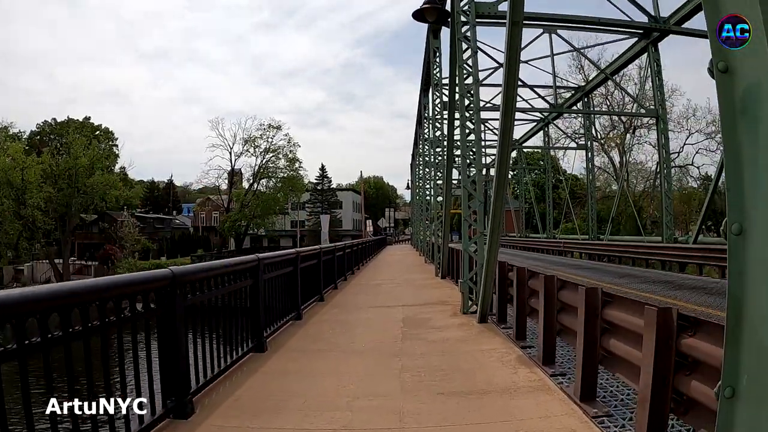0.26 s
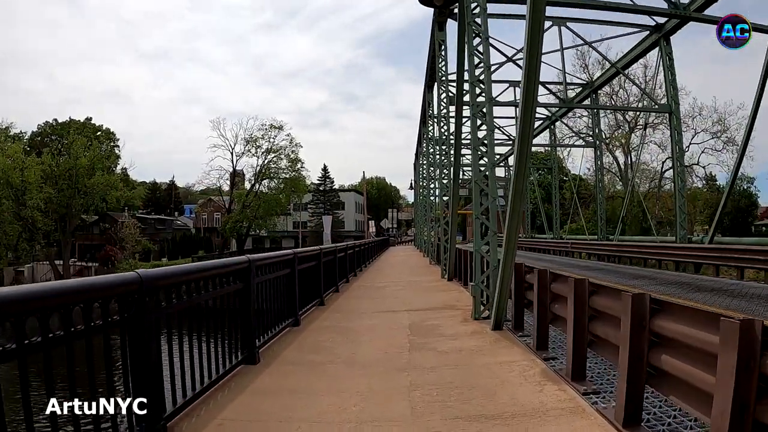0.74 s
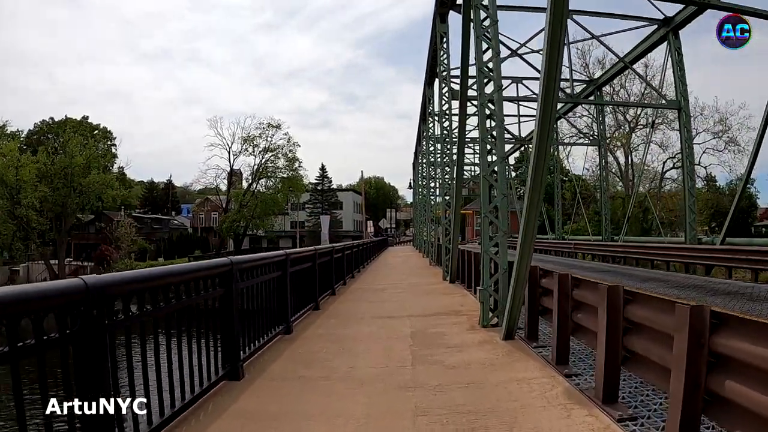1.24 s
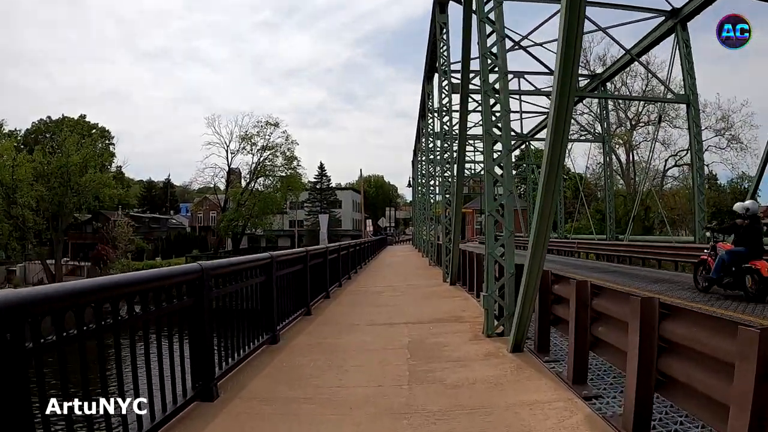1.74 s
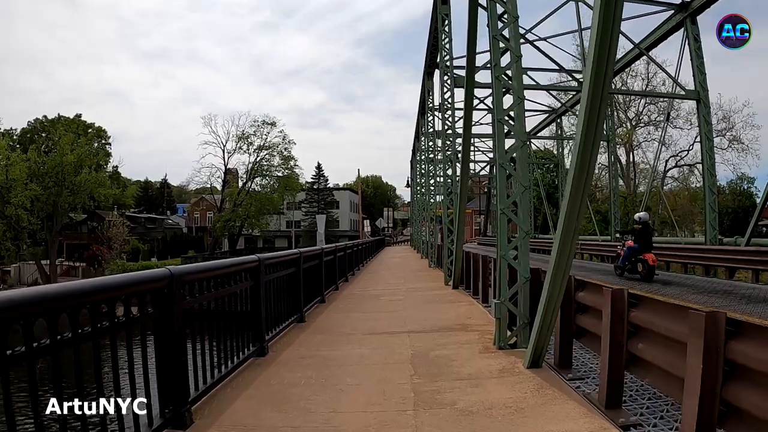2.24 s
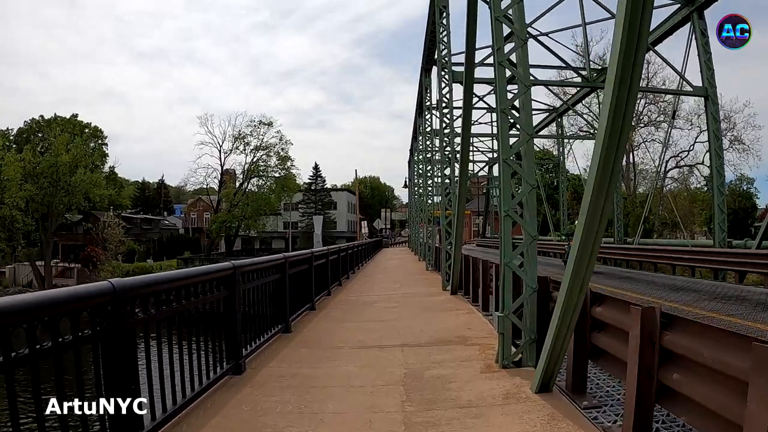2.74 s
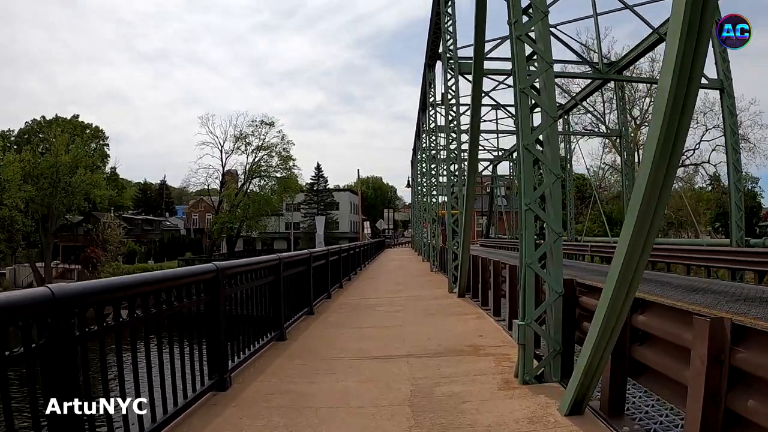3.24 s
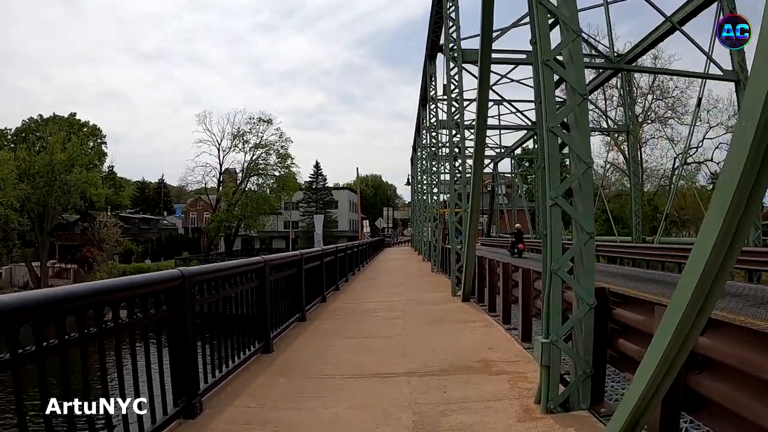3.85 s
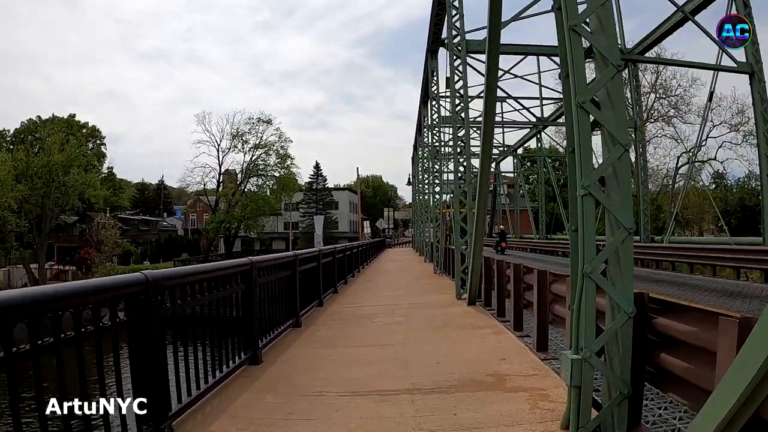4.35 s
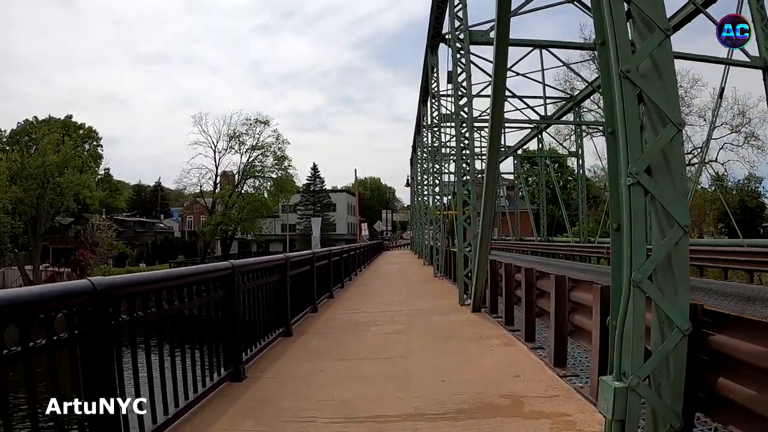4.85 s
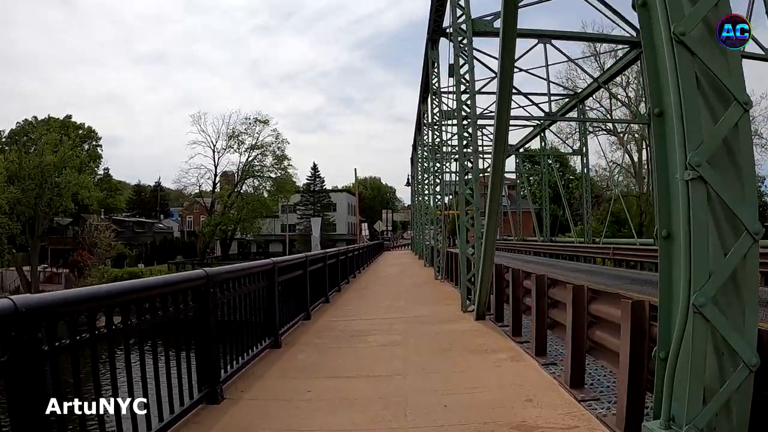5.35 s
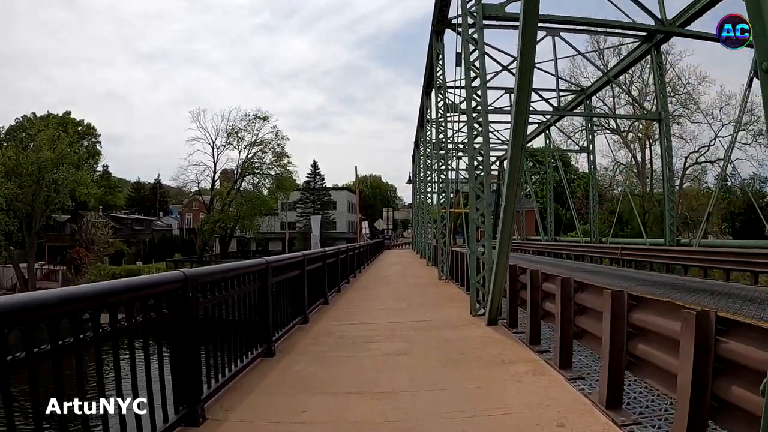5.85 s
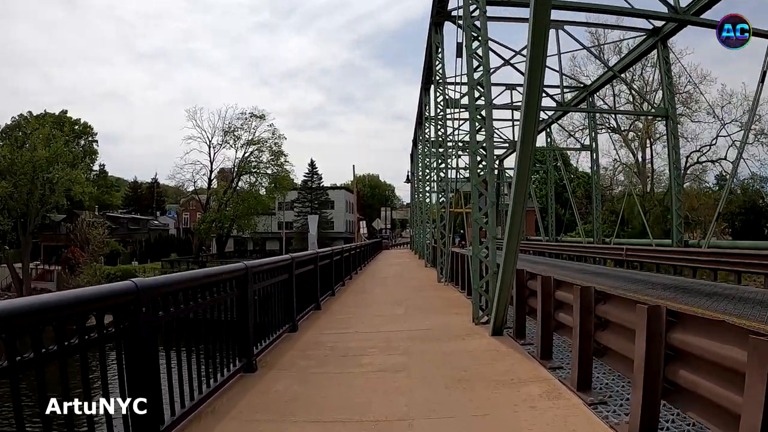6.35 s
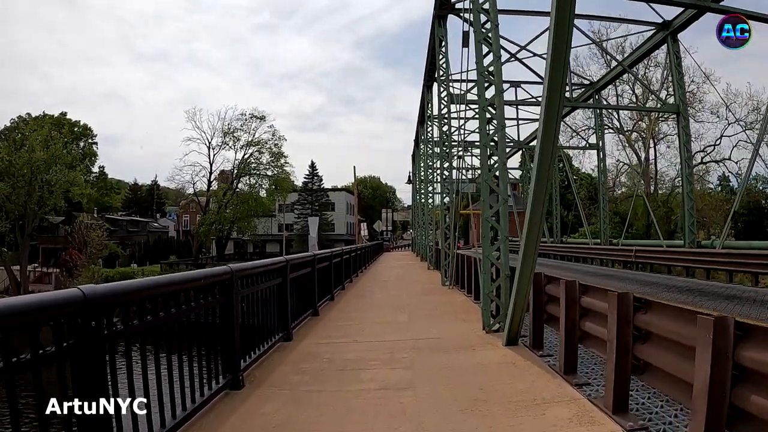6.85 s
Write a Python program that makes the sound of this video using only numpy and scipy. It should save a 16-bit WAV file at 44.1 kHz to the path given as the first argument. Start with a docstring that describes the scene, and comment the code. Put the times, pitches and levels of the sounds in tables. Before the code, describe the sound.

On the footway of an open-deck steel bridge, a stereo microphone hears tyres droning low and roaring softly on the grid to the right. A chuffing twin-cylinder motorcycle approaches with small metallic chinks, passes near two seconds with crackling exhaust, then recedes behind girders. Loose panels clank in scattered clusters. Finally the throttle closes to soft puffs while a distant bird chips.

```python
"""Footway of a steel truss bridge with an open grid deck, roadway to the right, a two-port microphone.
From the start tyres drone and roar on the grid and a twin-cylinder motorcycle chuffs: engine orders under
bursts of hiss. Loose panels clank as struck modes with noise; the grid rattles in clumps of clicks.
The motorcycle passes 3.7 m off at 1.8 s with chinks and hard cracks, then rides away behind girders.
After 5.3 s a distant bird chips in falling whistles, the throttle shuts to soft puffs, and a wash swells."""
import sys
import numpy as np
from scipy import signal
from scipy.fft import rfft, irfft
from scipy.io import wavfile
from scipy.ndimage import uniform_filter1d, map_coordinates

SR = 44100
rng = np.random.default_rng(int(sys.argv[2]) if len(sys.argv) > 2 else 0)


def to_wav(s):
    """Save 16-bit WAV."""
    ch = np.atleast_2d(s).T  # columns
    pcm = np.round(np.clip(ch, -1, 1) * 32767)  # PCM
    wavfile.write(sys.argv[1], SR, pcm.astype(np.int16))


N = 313110
TIME, HZ = np.arange(N) / SR, np.fft.rfftfreq(N, 1 / SR)

# Levels are relative: each function adds its own trim. Spectra give only the shape of a colour.

# Microphone ports. Likeness of the two: pitch_hz, likeness (0-1)
PORT_LIKENESS = [(30, .75), (70, .985), (300, .99), (700, .94), (2000, .9), (3500, .82), (6000, .72),
                 (8000, .45), (11000, .45), (15000, .2)]
# lead of the right port for sound from the roadway: pitch_hz, lead_rad
PORT_LEAD = [(0, 0), (250, .1), (600, .34), (1200, .7), (2400, 1.45), (3200, 1.15), (4000, 1.75), (5000, 2),
             (6500, 2.6), (8000, 3), (9000, 2.5), (11000, 3.1)]
# left minus right: pitch_hz, level_db
PORT_LEAN = [(60, 5), (300, 2), (1000, 1), (1700, 2), (2800, 0.5), (4000, 0), (5200, -2.5), (7200, 1),
             (8400, -2), (10000, -3), (13000, -2.5)]
EDGE_HZ = 15100  # highest pitch kept

# Motorcycle engine speed: time_s, four_stroke_cycles_per_s
ENGINE_SPEED = [(0, 15.05), (.5, 14.95), (1, 14.7), (1.5, 14.55), (1.8, 14.37), (2.5, 14.39), (3.5, 14.43),
                (4.5, 14.39), (5.2, 14.36), (5.6, 14.0)]
# a moment the first cylinder fires (s), and the second cylinder's lag (cycles)
FIRING_S, SECOND_CYLINDER = 2.286, .585
# the ride: moment it is nearest (s), speed (m/s), distance of its lane (m)
PASS_S, RIDE_M_PER_S, LANE_M = 1.82, 6.56, 3.68
# exhaust orders: multiple of the cycle rate, level_db
EXHAUST_ORDERS = [(4, -33.5), (5, -28.5), (6, -32), (7, -24.5), (8, -31), (9, -36), (10, -39), (11, -36),
                  (12, -35), (14, -41.5), (15, -36), (17, -41.5), (19, -34.5), (20, -42.5), (21, -29.5),
                  (22, -38.5), (24, -51.5)]
# orders that swell and fade as the ride shifts their echoes: multiple, crest_s, period_s, depth_db
BOOMING_ORDERS = [(5, 4.19, 2.5, 6), (6, 0.66, 2.1, 6), (7, 2.74, 1.675, 1), (12, 2.27, 2.7, 5),
                  (19, 2.37, 1.7, 4.5), (21, 3.2, 2.4, 0.5)]
# hiss of the tailpipes with their narrow resonances: pitch_hz, density_db_per_hz
CHUFF_COLOUR = [(500, -7), (1500, -2.5), (2300, -8.5), (2470, -0.5), (2900, -6.5), (3520, 0.5), (3650, -7),
                (3780, 0), (4000, -4), (4300, -1), (4540, -3), (4750, -2.5), (5300, -3.5), (5650, -5.5),
                (6200, -8), (7200, -10), (8000, -18.5), (8550, -12), (9200, -17), (10000, -27.5),
                (11200, -25.5), (12500, -28), (15000, -41.5)]
# second cylinder's pipe against the first, as the angle to the tailpipes changes: time_s, level_db
SECOND_PIPE = [(1.6, 2.5), (2.0, -3.5), (2.15, -5), (2.4, -2.5), (2.6, -3.5), (3.5, -2.5), (4.3, -2),
               (5.2, -0.5)]
# hiss beams backwards: level at the lane's distance, gain ahead of the pipe (dB)
CHUFF_DB, AHEAD_DB = -35.5, -26
# the beam's edge: place along the road and width (m)
BEAM_AT_M, BEAM_EDGE_M = -.7, 1.6
# the rider opens up a little before shutting the throttle: from (s), extra hiss (dB)
PUSH_S, PUSH_DB = 4.89, 2
# girders pass between tailpipes and footway: time_s, loss_db
GIRDER_SHADOWS = [(2.48, 1), (2.78, 4.5), (3.28, 7), (3.75, 1.5), (4.038, 10), (4.65, 11.5), (4.86, 9)]
SHADOW_S = .029  # half the length of each shadow
# far guard rail's echo of the exhaust as the angle changes: time_s, delay_s, strength
RAIL_ECHO = [(1.0, .0053, .5), (1.9, .0077, .35), (2.1, .0075, .35), (2.6, .006, .55), (3.1, .0047, .85),
             (3.6, .004, .7), (5.5, .0027, .45)]
CREST_S = .0025  # from the valve opening to the crest of its burst
# the truss scatters each burst: strength, decay (s)
SCATTER, SCATTER_S = .37, .03
# grain of the bursts: depth (dB), rate (Hz); furthest a firing strays (s)
CRACKLE_DB, CRACKLE_HZ, STRAY_S = 2.8, 220, .001
# sharpest exhaust cracks: start_s, snap_db, bark_db, fizz_db
CRACKS = [(1.016, -54, -32, -65), (1.22, -46, -37, -59), (1.29, -48, -32.5, -60), (1.356, -48.5, -33, -57),
          (1.426, -49, -39, -58), (1.495, -56, -35, -72), (1.564, -43.5, -38, -54),
          (1.5917, -44, -29.5, -70), (1.633, -46, -29.5, -60), (1.704, -46, -38.5, -65),
          (1.728, -36, -32.5, -52), (1.798, -33.5, -29.5, -55), (1.871, -31.5, -38.5, -57),
          (1.94, -38, -36.5, -70), (1.987, -35, -39, -59), (2.009, -27, -40, -55),
          (2.076, -29.5, -31.5, -64), (2.147, -28.5, -26.5, -73), (2.2164, -33, -30.5, -72),
          (2.2846, -25, -30, -66), (2.355, -25, -32, -58), (2.5615, -30, -38, -63),
          (2.632, -34.5, -42, -61), (2.82, -44, -32, -68), (2.888, -33, -34, -63), (2.958, -36, -33, -64),
          (3.027, -35.5, -34.5, -68), (3.123, -33, -45, -68), (3.4, -40.5, -52, -71),
          (3.4632, -37.5, -47, -69), (3.601, -34.5, -47, -73), (5.342, -40.5, -47.5, -77)]
# colour of the snap in the pipe's upper resonances: pitch_hz, density_db_per_hz
SNAP_COLOUR = [(500, -11.5), (1500, -2), (2900, -11.5), (3550, 3.5), (3650, -1.5), (3770, 9), (4000, 4.5),
               (4300, 7), (4540, 9), (4750, 7), (5300, 7), (5700, -1), (6300, -14.5), (8000, -17.5),
               (8600, -12), (10000, -28.5), (15000, -39.5)]
# colour of the hollow bark: pitch_hz, density_db_per_hz
BARK_COLOUR = [(500, -15), (1200, -5), (1720, 2.5), (2250, 1), (2460, 3), (2800, -2.5), (3400, -2),
               (3900, -9.5), (5000, -31), (9000, -50), (15000, -73)]
# colour of the thin fizz: pitch_hz, density_db_per_hz
FIZZ_COLOUR = [(3000, -16), (6000, -6), (8500, 2), (10000, 4), (11500, 1), (13000, -1), (14300, -8.5),
               (15000, -18)]
# slow puffs, mostly in pairs, once the throttle is shut: start_s, level_db
PUFFS = [(5.5606, -42), (5.7162, -56), (5.7636, -45.5), (5.8794, -48), (5.9322, -48), (6.1453, -41.5),
         (6.2, -55.5), (6.2745, -58), (6.3298, -53), (6.3852, -53), (6.5214, -42.5), (6.5763, -45),
         (6.716, -43), (6.7738, -47.5), (6.911, -44), (6.9719, -48.5)]
# small metallic chinks as the motorcycle rides over the grid: start_s, pitch_hz, peak_db
CHINKS = [(.617, 2620, -32), (.825, 3400, -43), (.881, 1721, -26.5), (.916, 1870, -28), (.944, 1990, -23),
          (1.015, 3450, -29), (1.045, 3600, -32), (1.149, 2650, -28), (1.219, 3310, -28),
          (1.288, 3396, -28), (1.357, 3020, -27), (1.453, 2300, -28), (1.492, 1830, -21),
          (1.568, 2240, -28), (1.702, 3500, -27), (2.05, 2250, -22), (2.675, 3300, -29), (3.65, 3450, -34),
          (5.245, 3830, -34), (5.317, 3330, -33), (5.386, 3450, -35)]

# Tyres drumming over the grid bars: time_s, pitch_hz, width_hz
DRONE_BAND = [(0, 92.12, 75.37), (2.5, 91.9, 60.51), (5, 102.1, 70.11), (5.95, 100.7, 50.48),
              (6.4, 92.7, 40.57), (6.9, 84.97, 21.93), (7.1, 82.5, 21.85)]
# level of that drone: time_s, level_db
DRONE_LEVEL = [(0, -18.5), (.4, -20), (1.5, -23), (2.0, -34), (2.45, -32), (2.75, -20), (3.3, -26.5),
               (3.8, -23.5), (4.3, -33), (5.2, -25), (5.45, -24), (5.95, -21.5), (6.4, -25), (6.85, -20.5),
               (7.1, -24)]
# tyre roar as cars draw near and recede: time_s, level_db
ROAR_LEVEL = [(0.0, -38), (0.47, -39.5), (0.6, -37), (0.87, -36.5), (1.32, -36), (1.54, -35), (2.69, -38),
              (3.1, -39), (3.44, -41), (6.43, -44.5), (7.1, -44)]
# colour of the roar: pitch_hz, density_db_per_hz
ROAR_COLOUR = [(250, -12), (450, 7.5), (600, 1.5), (820, -3), (1030, 0), (1350, -5), (1800, -8),
               (2600, -11.5), (3800, -16.5), (4800, -22.5), (7000, -28), (9400, -35), (10500, -41),
               (13000, -44), (15000, -74.5)]
# colour of the deck's ring: pitch_hz, density_db_per_hz
DECK_COLOUR = [(30, -67), (110, -22), (165, 1.5), (200, -1.5), (240, 3.5), (265, 3.5), (300, 5.5),
               (325, -1.5), (355, -5.5), (440, -14.5), (520, -22.5), (800, -60), (4000, -110)]
# deck's ring under the wheels: time_s, level_db
DECK_LEVEL = [(0, -28), (.5, -23), (.9, -25), (1.25, -22), (1.8, -25), (2.25, -26.5), (2.6, -31),
              (3.15, -24.5), (3.4, -31.5), (3.75, -26), (4.1, -31), (5.2, -31.5), (5.7, -38), (6.55, -35.5),
              (6.75, -33.5), (7.1, -40)]
# the ring sinks as the cars slow: time_s, pitch_factor
DECK_PITCH = [(0, 1.05), (1.3, 1.04), (2.2, .99), (5.3, 1), (6.1, .91), (7.1, .87)]
# grid rattle as the near wheels go by: time_s, level_db
RATTLE_LEVEL = [(0, -46.5), (.55, -50), (.95, -44), (1.1, -55), (1.4, -38), (1.7, -45.5), (2.3, -45.5),
                (2.8, -52), (3.3, -49), (4.5, -61), (5.5, -69.5)]
# colour of that rattle: pitch_hz, density_db_per_hz
RATTLE_COLOUR = [(400, -12.5), (930, 1), (1250, -7), (1750, 2.5), (2300, -5), (2460, -2.5), (2900, -9),
                 (3550, -8), (4500, -14), (7000, -27), (10000, -38), (15000, -57)]
# wheels on loose panels, and the rebounds: start_s, level_db, brightness_db_per_octave, thump_db, decay_s
CLANKS = [(0.0966, -20, -4, -28, 0.011), (0.115, -23, -12, -21, 0.029), (.131, -29, -4, -26, 0.011),
          (.148, -24, -5, -18, .022), (0.1663, -24, -2, -17, 0.02), (0.5, -30.5, 2, -51, .006),
          (.513, -26, -2, -49, 0.0075), (2.569, -29.5, -9, -27, 0.058), (3.1667, -20.5, -1, -15, 0.017),
          (3.185, -22, -4, -25, 0.018), (3.194, -24, -6, -16, 0.021), (3.217, -25, -12, -16, 0.027),
          (3.238, -38, -8, -29, .01), (3.7869, -20.5, -4, -15, 0.016), (3.797, -26.5, -2, -22, 0.015),
          (3.817, -31, -5, -28, 0.015), (3.8517, -24.5, 0.5, -25, 0.015), (3.865, -26.5, -17, -22, 0.014),
          (3.883, -32, -2, -27, 0.02), (4.424, -36, 3, -25, 0.007), (4.505, -29.5, 5, -28, 0.0045),
          (4.5071, -21, 0, -14, 0.011), (4.52, -28, 0, -24, 0.0066), (4.538, -32, -4.5, -29, 0.047)]
# colour of the blows: pitch_hz, density_db_per_hz
CLANK_COLOUR = [(120, -19), (300, -8.5), (470, -1), (700, -2.5), (1050, -2), (1190, -4.5), (1340, -2),
                (1520, -4), (2100, -5), (2320, -8), (2700, -9.5), (3200, -13.5), (3500, -12.5),
                (4000, -15.5), (4700, -20.5), (5500, -29.5), (8000, -40), (14000, -68)]
# ringing modes of a panel: pitch_hz, level_db, t60_s
PANEL_MODES = [(452, 6, .25), (517, 1, .25), (587, -3, .25), (845, 6, .15), (921, 0, .3), (1001, -3, .2),
               (1287, 1, .25), (1325, 1, .22), (1394, -1, .18), (1590, -2, .2), (1938, 0, .18),
               (2114, 0, .24), (2439, -1, .18), (2627, -3, .2), (2853, -6, .2), (2950, -5, .16),
               (3440, -8, .12)]
# delay of the slap's first echo, decay of the truss's echo and of the deck's thump (s)
SLAP_ECHO_S, TRUSS_ECHO_S, THUMP_S = .003, .05, .013
# a weak blow soon after another is a rebound and slaps softly: (after s, within s), weaker than (dB)
REBOUND_S, REBOUND_DB = (.005, .035), -23.5

# Air on the bridge: pitch_hz, density_db_per_hz
AIR_COLOUR = [(15, 13), (30, 22), (50, 19.5), (90, 36), (300, 7.5), (1000, 2.5), (2500, -16), (4000, -20.5),
              (6000, -17.5), (7400, -25), (8100, -41), (8900, -32.5), (10500, -39), (12500, -52),
              (14000, -78.5)]
# bird chips: start_s, start_hz, level_db
CHIPS = [(5.31, 5950, -59), (5.5, 5904, -62), (5.85, 6100, -67), (6.014, 6800, -61), (6.323, 5800, -55),
         (6.574, 7500, -61), (6.632, 7150, -56.5), (6.725, 6700, -58)]
# every chip falls: length (s), fall (Hz per s)
CHIP_S, CHIP_FALL_HZ_PER_S = .015, 95000


def amp(db):
    """Decibels to gain."""
    return 10 ** (np.asarray(db) / 20)


def unit(x):
    """Scales to rms 1."""
    return x / np.sqrt(np.mean(x ** 2) + 1e-20)


def curves(rows):
    """The columns of a time table, at every sample."""
    s, *columns = np.transpose(rows)
    return [np.interp(TIME, s, c) for c in columns]


def read(points, hz):
    """A table on a log-frequency axis."""
    f, value = np.transpose(points)
    return np.interp(np.log(hz + 1), np.log(f + 1), value)


def add(mix, s, sound):
    """Adds a sound to the mix at time s."""
    part = mix[..., round(s * SR):][..., :sound.shape[-1]]
    part += sound[..., :part.shape[-1]]


def wander(rate):
    """Random curve of rms 1, varying up to about the given rate (Hz)."""
    hz = np.fft.rfftfreq(N // 10, 10 / SR)
    slow = irfft(rfft(rng.standard_normal(N // 10)) / (1 + (hz / rate) ** 4))
    return np.interp(TIME, np.arange(len(slow)) * 10 / SR, unit(slow))


def ports(drive, colour, turn, lean_db=0):
    """Colours two unrelated signals into a microphone pair; turn is 1 from the roadway, 0 straight ahead."""
    size = drive.shape[1]
    hz = np.fft.rfftfreq(size, 1 / SR)
    a, b = rfft(drive)
    same = read(PORT_LIKENESS, hz)
    side = amp((read(PORT_LEAN, hz) + lean_db * hz / (hz + 900)) / 2)
    left = a * side * np.exp(-1j * turn * read(PORT_LEAD, hz))
    right = (same * a + np.sqrt(1 - same ** 2) * b) / side
    return irfft(np.array([left, right]) * unit(amp(read(colour, hz))), size)


def bass_pair(x, lean_db=0):
    """The same wave at both ports; the left is stronger by lean_db plus 1.25 dB."""
    return x * amp(np.array([[1], [-1]]) * (lean_db + 1.25) / 2)


def dapple(x, depth_db, size=512):
    """Random patches over time and pitch give the noise an uneven, grainy colour."""
    z = signal.stft(x, nperseg=size, noverlap=size * 3 // 4)[2]
    patches = rng.standard_normal(z.shape[1:])
    patches = uniform_filter1d(uniform_filter1d(patches, size=7, axis=0), size=9, axis=1)
    gain = unit(amp(depth_db * np.clip(unit(patches), -2, 2)))
    return signal.istft(z * gain, nperseg=size, noverlap=size * 3 // 4)[1][:, :N]


def clicks(size, per_s, spread_db):
    """Random clicks of either sign, their strengths spread by spread_db, rms 1."""
    chance, strength = rng.random(size), rng.standard_normal(size)
    sign = rng.choice([-1, 1], size)
    return unit((chance < per_s / SR) * sign * amp(spread_db * np.clip(strength, -2, 2)))


def engine_turns():
    """Count of engine cycles; the first cylinder fires on whole numbers."""
    turns = np.cumsum(curves(ENGINE_SPEED)[0]) / SR
    return turns - np.interp(FIRING_S, TIME, turns)


def ride():
    """Motorcycle's distance gain (dB), and how far the footway lies ahead of the tailpipes' beam (0-1)."""
    along = RIDE_M_PER_S * (TIME - PASS_S)
    ahead = 1 / (1 + np.exp((along - BEAM_AT_M) / BEAM_EDGE_M))
    return -20 * np.log10(np.hypot(along, LANE_M) / LANE_M), ahead


def firing(t, sharpness=3):
    """Envelope of one burst from a tailpipe, cresting at 1."""
    return (t / CREST_S * np.exp(1 - t / CREST_S)) ** sharpness


def rail_echo(x):
    """The same sound off the guard rail: its sliding delay sweeps a comb through the hiss."""
    delay_s, strength = curves(RAIL_ECHO)
    return strength * np.array([map_coordinates(side, [(TIME - delay_s) * SR], order=3) for side in x])


def exhaust(level_db=0.0, fade_db=4.0, fade_hz=1.06, low_spread=0.12, high_spread=0.31, high_ahead_db=-4):
    """Firings sound the pipe as a stack of orders; low ones carry farthest, all die as the throttle shuts."""
    turns, (far_db, ahead) = engine_turns(), ride()
    swells = {}
    for k, crest, period, depth in BOOMING_ORDERS:
        swells[round(k)] = depth * np.cos(2 * np.pi * (TIME - crest) / period)
    stack = np.zeros(N)
    for k, db in EXHAUST_ORDERS:
        k = round(k)
        spread = np.interp(k, [7, 12], [low_spread, high_spread])  # share of the distance loss
        beam_db = ahead * np.interp(k, [8, 19], [0, high_ahead_db])
        swell = swells.get(k, fade_db * wander(fade_hz))
        gain = amp(db + level_db + spread * far_db + beam_db + swell)
        stack += gain * np.cos(2 * np.pi * (k * turns + rng.random()))
    return bass_pair(np.sqrt(2) * stack * np.interp(TIME, [5.45, 5.75], [1, 0]))


def chuffs(spread=0.97, dull_hz=9500):
    """Each exhaust valve lets out a burst of hiss, thrown back by rail and truss, duller with distance."""
    turns, kicks = engine_turns(), np.zeros(N)
    for offset, db in ((0, np.zeros(N)), (SECOND_CYLINDER, curves(SECOND_PIPE)[0])):
        at = np.flatnonzero(np.diff(np.floor(turns - offset)))
        # each firing strays in time, and in force by up to 2.5 dB
        stray, force_db = rng.uniform(-1, 1, (len(at), 2)).T * [[STRAY_S * SR], [2.5]]
        kicks[np.clip(at + stray.astype(int), 0, N - 1)] = amp(db[at] + force_db) ** 2
    t = TIME[:SR // 8]
    scatter = SCATTER * (1 - np.exp(-t / CREST_S)) * np.exp(-t / SCATTER_S)
    power = abs(signal.oaconvolve(kicks, firing(t) ** 2 + scatter ** 2)[:N])
    envelope = unit(np.sqrt(power) * amp(CRACKLE_DB * wander(CRACKLE_HZ)))
    hiss = dapple(envelope * rng.standard_normal((2, N)), 3.5)

    far_db, ahead = ride()
    shadow_db = sum(db * np.exp(-((TIME - s) / SHADOW_S) ** 2) for s, db in GIRDER_SHADOWS)
    throttle = amp(PUSH_DB * (TIME > PUSH_S)) * np.interp(TIME, [5.39, 5.45], [1, 0])
    level = amp(CHUFF_DB + spread * far_db + AHEAD_DB * ahead - shadow_db)
    near = ports(hiss * throttle * level, CHUFF_COLOUR, turn=0.93, lean_db=-1.5)
    far = irfft(rfft(near) / (1 + (HZ / dull_hz) ** 8), N)
    direct = far + amp(far_db / 2) * (near - far)
    return direct + rail_echo(direct)


def drone(level_db=0, top_hz=128, second_db=-21, third_db=-21):
    """Tyres drum over the grid bars: a wavering low band with faint overtones that sinks as a car slows."""
    hz, width = curves(DRONE_BAND)
    clock = np.cumsum(width) / SR  # the band is wide where this clock runs fast
    steps = np.arange(np.ceil(clock[-1]) * 20) / 20
    z = [1, 1j] @ rng.standard_normal((2, len(steps)))
    r = np.exp(-np.pi / 20)
    z = np.interp(clock, steps, signal.lfilter([1], np.poly([r, r]), z))
    z /= np.maximum(uniform_filter1d(abs(z) ** 2, SR // 10), 1e-9) ** .43  # evens out the swells
    z = z * np.exp(2j * np.pi * np.cumsum(hz) / SR)
    tone = unit(irfft(rfft(z.real) / np.sqrt(1 + (HZ / top_hz) ** 16), N))
    for k, db in enumerate((second_db, third_db), 2):
        tone = tone + amp(db) * unit(abs(z) * np.cos(k * np.angle(z)))
    return bass_pair(tone * amp(curves(DRONE_LEVEL)[0] + level_db))


def tyres(deck_db=0.0, roar_db=1.94, grain_db=0.43, flutter_db=1.07, far_db=-48, near_db=-40, dull_hz=1500):
    """The deck rings and the treads roar in fine grains; far cars lose their treble."""
    roar, ring = curves(ROAR_LEVEL)[0], curves(DECK_LEVEL)[0]
    rolled = np.cumsum(curves(DECK_PITCH)[0])  # reading position, so pitch follows its speed
    deck = ports(rng.standard_normal((2, N)), DECK_COLOUR, turn=1)
    deck = np.array([map_coordinates(side, [rolled], order=3, mode="mirror") for side in deck])
    deck = deck * amp(ring + deck_db)
    grains = unit(amp(grain_db * wander(200) + flutter_db * wander(31)))
    treads = dapple(rng.standard_normal((2, N)) * grains, 1.7)
    near = ports(treads * amp(roar + roar_db), ROAR_COLOUR, turn=1, lean_db=0.5)
    far = irfft(rfft(near) / (1 + (HZ / dull_hz) ** 4) ** .5, N)
    closeness = np.clip((roar - far_db) / (near_db - far_db), 0, 1)
    return deck + far + closeness * (near - far)


def grid_rattle(level_db=1.0, per_s=1500, spread_db=3, clump_db=2.5, clump_hz=60):
    """Near wheels shake the grid bars against their bearers, in dense clumps of small knocks."""
    knocks = np.array([clicks(N, per_s, spread_db), clicks(N, per_s, spread_db)])
    knocks = knocks * unit(amp(clump_db * wander(clump_hz)))
    level = amp(curves(RATTLE_LEVEL)[0] + level_db)
    return ports(dapple(knocks, 5) * level, RATTLE_COLOUR, turn=1)


def air(level_db=-33, gust_db=1.35, breeze_db=-43, breeze_hz=32):
    """Rumble of the span, the hush of town and river, and a light breeze on each port."""
    level = amp(level_db + gust_db * wander(5.2))
    hush = ports(rng.standard_normal((2, N)) * level, AIR_COLOUR, turn=0.49)
    breeze = np.array([wander(breeze_hz), wander(breeze_hz)]) * amp(breeze_db + 2 * wander(2))
    return hush + breeze


def panel_body(x, width_hz=70):
    """Under the wheel's weight the panel's modes above 600 Hz are damped into broad resonances."""
    return sum(amp(db) * signal.lfilter(*signal.iirpeak(hz, hz / width_hz, SR), x)
               for hz, db, t60 in PANEL_MODES if hz > 600)


def panel_ring(t):
    """Every blow lands at another spot and shares its energy differently among the modes."""
    ring = np.zeros(len(t))
    for hz, db, t60 in PANEL_MODES:
        level = amp(db + 3 * rng.uniform(-1, 1) - 60 * t / t60)
        ring += level * np.sin(2 * np.pi * (hz * t + rng.random()))
    return ring


def clank_noise(drive, tilt_db):
    """Clank colour tilted about 1 kHz (dB per octave) and heard at the ports."""
    colour = [(hz, db + tilt_db * np.log2(np.clip(hz, 400, 4500) / 1000)) for hz, db in CLANK_COLOUR]
    return ports(drive, colour, turn=0.77, lean_db=9.0)


def clanks(level_db=-1.5, slap=9, echo_slap=8, rebound_slap=0.47, tail_db=-15, tail_tilt_db=-3, ring_db=-9,
           chatter=1500, chatter_share=0.95, scrape_share=.45, body_share=.8, thump_db=-3):
    """A panel slaps its bearing, chatters and rings; the footway and truss echo it and the deck thumps."""
    out, onset = np.zeros((2, N)), SR // 250
    t = np.maximum(TIME[:SR // 2] - onset / SR, 0)
    gaps = np.diff([row[0] for row in CLANKS], prepend=-1)
    for (s, db, bright, thump, rattle_s), gap in zip(CLANKS, gaps):
        rebound = REBOUND_S[0] < gap < REBOUND_S[1] and db < REBOUND_DB
        hardness = rebound_slap if rebound else 1
        rattle = chatter_share * clicks(len(t), chatter, spread_db=0)
        rattle = rattle + scrape_share * rng.standard_normal((2, len(t)))
        rattle *= (1 - np.exp(-t / .001)) * np.exp(-t / rattle_s)
        rattle[0, onset] += hardness * slap
        rattle[0, onset + round(SLAP_ECHO_S * SR)] += hardness * echo_slap  # off the footway
        echo = amp(tail_db) * (1 - np.exp(-t / 0.0077)) * np.exp(-t / TRUSS_ECHO_S)
        echo = echo * rng.standard_normal((2, len(t)))
        rattle[0] += body_share * panel_body(rattle[0])
        blow = clank_noise(rattle, bright) + clank_noise(echo, bright + tail_tilt_db)
        ring = panel_ring(t)
        ring *= amp(ring_db) / np.std(ring[onset:SR // 40]) * np.minimum(t / .002, 1)
        push = t / THUMP_S * np.exp(1 - t / THUMP_S)
        push = push * np.sin(2 * np.pi * rng.uniform(46.28, 47.32) * t)  # Hz
        fade = np.interp(t, [.3, .45], [1, 0])
        clank = fade * amp(db + level_db) * (blow + bass_pair(ring, lean_db=2))
        add(out, s - onset / SR, clank + bass_pair(amp(thump + thump_db) * push))
    return out


def chinks(level_db=-2.0, width_hz=600, decay_s=0.014):
    """Something metal chatters briefly: a dry clack that rings loosely around one pitch."""
    out, t = np.zeros((2, N)), TIME[:SR // 10]
    clack_band = signal.butter(3, [1000, 3800], "bandpass", fs=SR, output="sos")
    for s, hz, db in CHINKS:
        chatter = rng.standard_normal((2, len(t))) * np.exp(-t / decay_s)
        pole = np.exp((2j * hz - width_hz) * np.pi / SR)
        ring = unit(signal.lfilter([1], np.poly([pole, pole]), chatter).real)
        ring += .45 * unit(signal.sosfilt(clack_band, chatter))
        add(out, s, amp(db + level_db) * ring / abs(ring).max())
    return ports(out, [(20, 0), (20000, 0)], turn=1)  # flat colour


def cracks(level_db=-3.0, bark_db=-3, fizz_db=0, fizz_tail=.24, fizz_tail_s=.05,
           sputter_share=0.24, sputter_s=0.02):
    """Some firings crack harder: a snap and a hollow bark sputter out, a thin fizz lingers in the truss."""
    (snap, bark, fizz), t = np.zeros((3, N)), TIME[:SR // 6]
    sputter = sputter_share * (1 - np.exp(-t / CREST_S)) * np.exp(-t / sputter_s)
    for s, snap_level, bark_level, fizz_level in CRACKS:
        add(snap, s, amp(snap_level + level_db) * (firing(t, sharpness=2.5) + sputter / 2))
        add(bark, s, amp(bark_level + bark_db) * (firing(t, sharpness=1) + sputter))
        add(fizz, s, amp(fizz_level + fizz_db) * (firing(t) + fizz_tail * np.exp(-t / fizz_tail_s)))
    hiss = dapple(rng.standard_normal((2, N)), 3.8, size=256)
    direct = ports(snap * hiss, SNAP_COLOUR, turn=1.0, lean_db=-3)
    direct = direct + ports(bark * hiss, BARK_COLOUR, turn=1.0)
    direct = direct + ports(fizz * hiss, FIZZ_COLOUR, turn=0.55)
    return direct + rail_echo(direct)


def bird(level_db=0):
    """Short falling whistles, stronger at the right port."""
    out, t = np.zeros(N), np.arange(0, CHIP_S, 1 / SR)
    for s, start_hz, db in CHIPS:
        hz = start_hz - CHIP_FALL_HZ_PER_S * t
        whistle = np.hanning(len(t)) ** .5 * np.sin(2 * np.pi * np.cumsum(hz) / SR)
        add(out, s, amp(db + level_db) * whistle)
    return bass_pair(out, lean_db=-7)


def bursts(rows, rise_s, decay_s):
    """A pair of noises that flares at each row (start_s, level_db)."""
    level, t = np.zeros(N), TIME[:SR // 5]
    for s, db in rows:
        add(level, s, amp(db) * (1 - np.exp(-t / rise_s)) * np.exp(-t / decay_s))
    return level * rng.standard_normal((2, N))


def puffs(level_db=-2, dull_hz=8500, decay_s=0.018, tail_db=-20, tail_s=0.078, tick_db=-8, tick_s=.002):
    """Soft grainy bursts of tailpipe hiss, each with a starting tick and an echo, dulled by distance."""
    hiss = bursts(PUFFS, rise_s=0.0019, decay_s=decay_s)
    hiss = hiss + amp(tick_db) * bursts(PUFFS, rise_s=.0002, decay_s=tick_s)
    hiss = hiss * unit(amp(2.5 * wander(250)))
    hiss = hiss + amp(tail_db) * bursts(PUFFS, rise_s=.01, decay_s=tail_s)
    pair = ports(dapple(hiss, 3), CHUFF_COLOUR, turn=0.59, lean_db=-0.5)
    return amp(level_db) * irfft(rfft(pair) / (1 + (HZ / dull_hz) ** 8), N)


def far_wash(level_db=-53.5, crest_s=5.97, width_s=0.11):
    """A soft hiss swells once and sinks, like tyres far along the bridge."""
    swell = amp(level_db) * np.exp(-((TIME - crest_s) / width_s) ** 2)
    colour = [(500, -22.5), (1300, -3), (2500, 1), (4000, -22), (9000, -44), (14000, -68)]
    return ports(swell * rng.standard_normal((2, N)), colour, turn=0.42)


def scene():
    """Everything heard from the footway."""
    motorcycle = exhaust() + chuffs() + cracks() + puffs()
    bridge = drone() + tyres() + far_wash() + grid_rattle() + chinks() + clanks()
    return motorcycle + bridge + bird() + air()


def record(dry):
    """Nothing sounds above about 15 kHz: a steep low-pass."""
    lowpass = signal.firwin(511, EDGE_HZ, window=("kaiser", 9), fs=SR)
    return signal.oaconvolve(dry, lowpass[None], "same")


dry = scene()
out = record(dry)
to_wav(out)
```